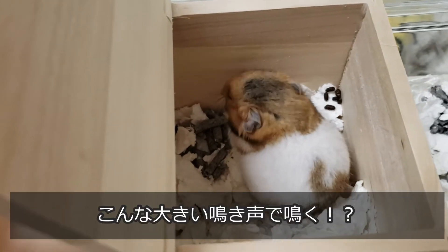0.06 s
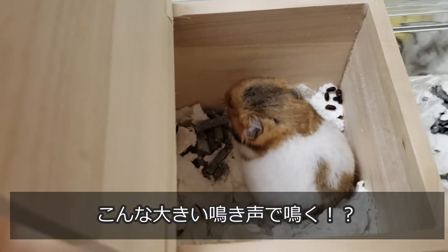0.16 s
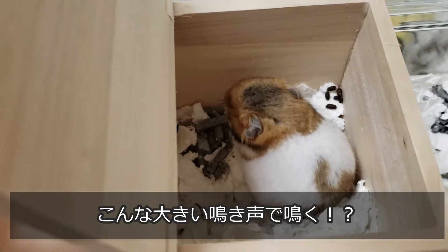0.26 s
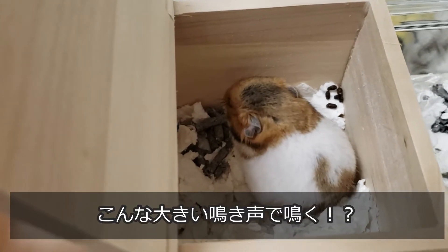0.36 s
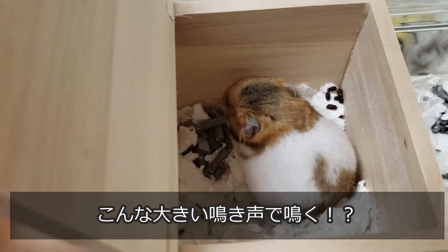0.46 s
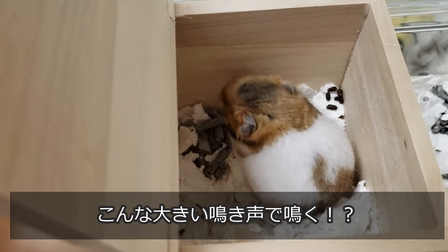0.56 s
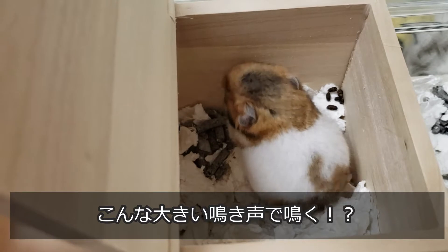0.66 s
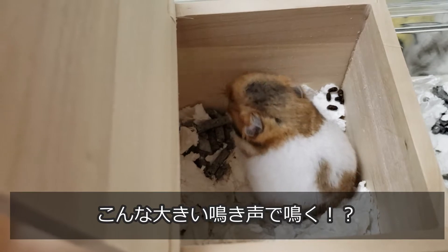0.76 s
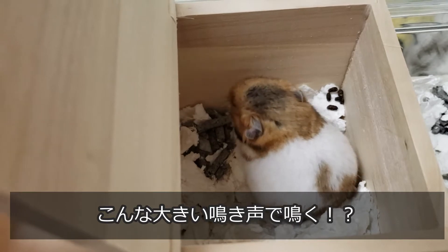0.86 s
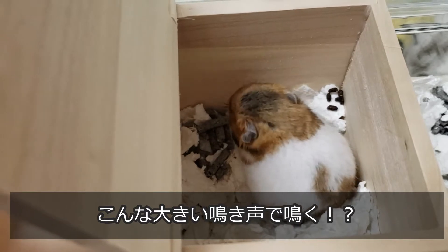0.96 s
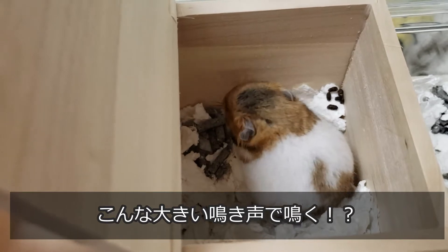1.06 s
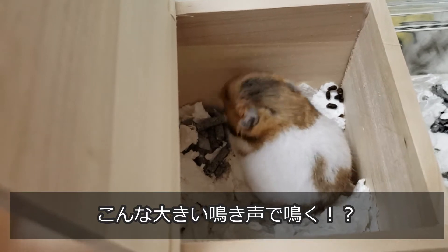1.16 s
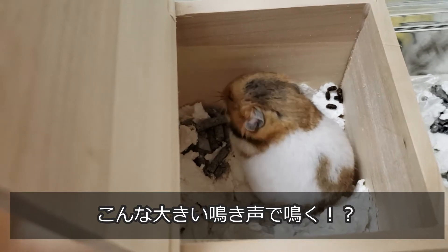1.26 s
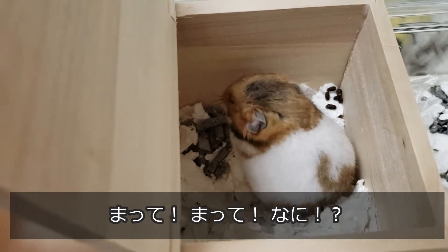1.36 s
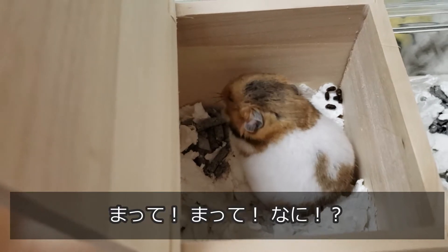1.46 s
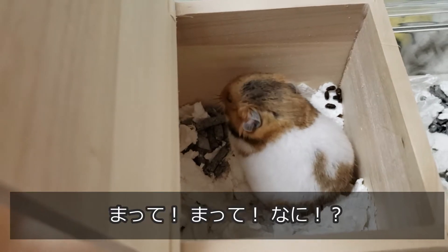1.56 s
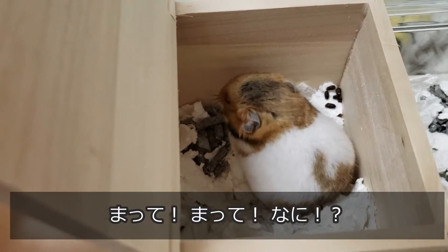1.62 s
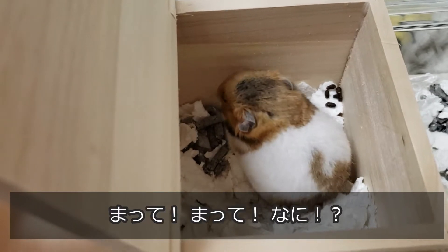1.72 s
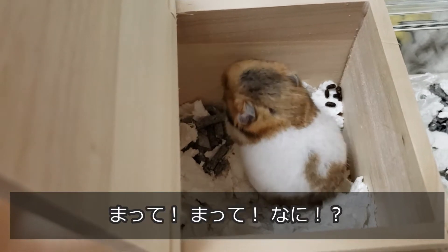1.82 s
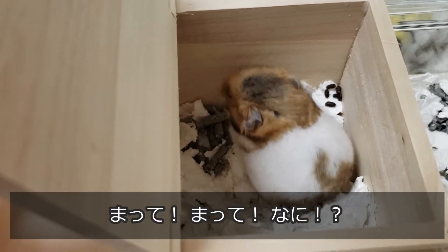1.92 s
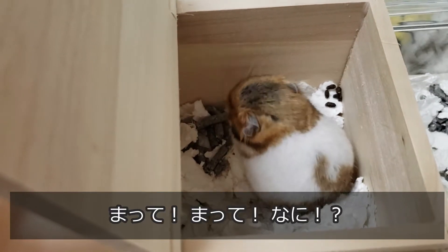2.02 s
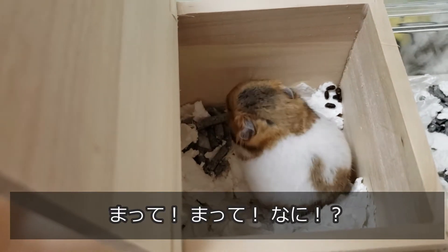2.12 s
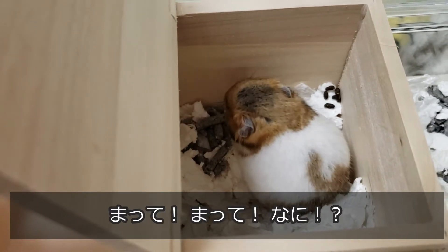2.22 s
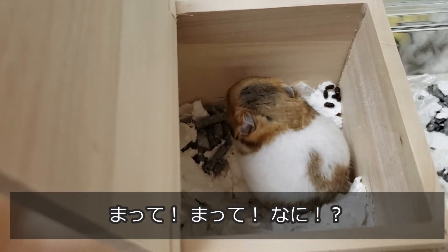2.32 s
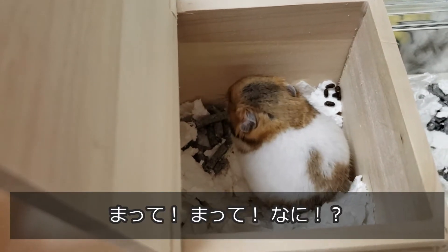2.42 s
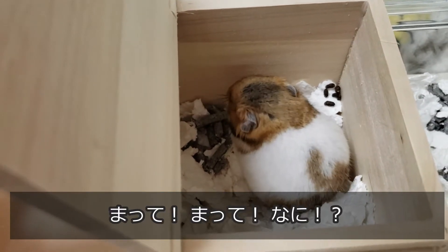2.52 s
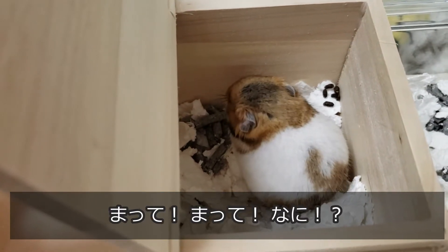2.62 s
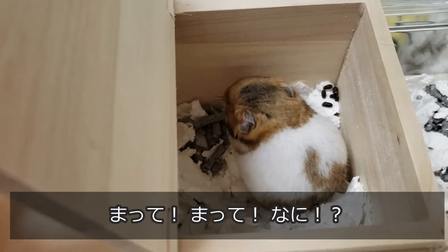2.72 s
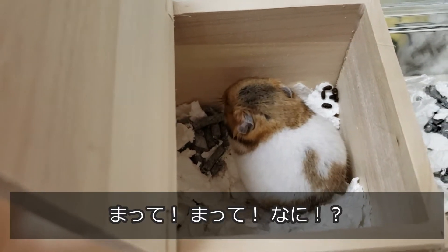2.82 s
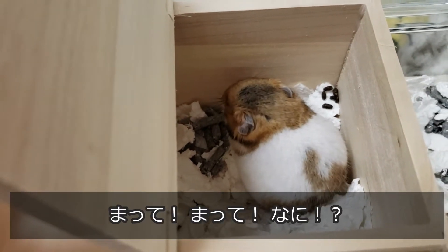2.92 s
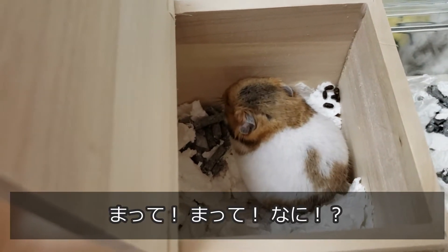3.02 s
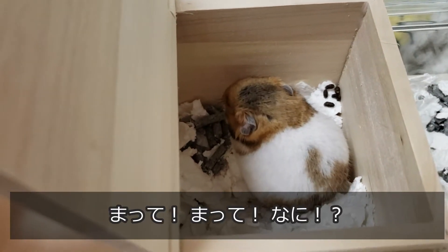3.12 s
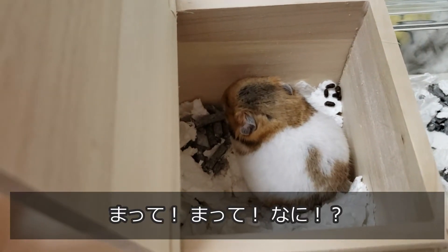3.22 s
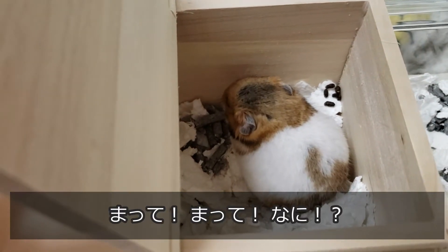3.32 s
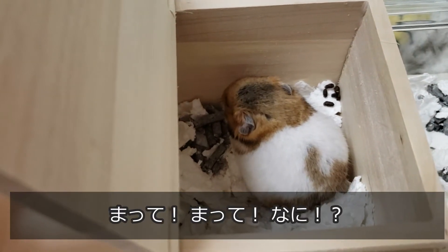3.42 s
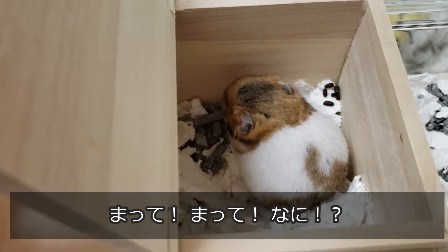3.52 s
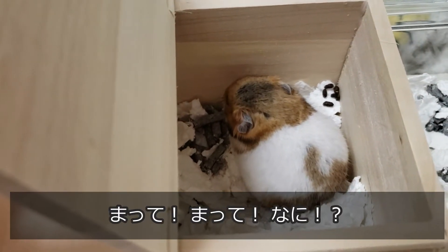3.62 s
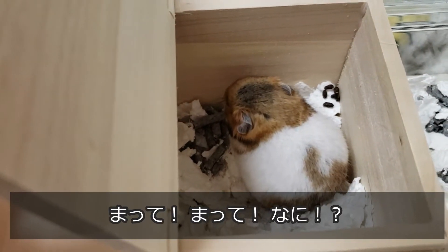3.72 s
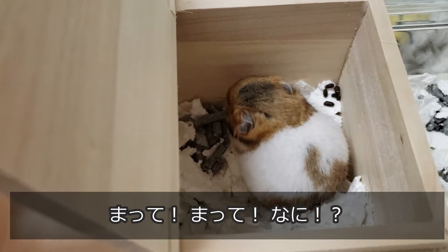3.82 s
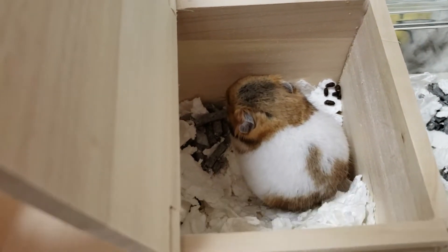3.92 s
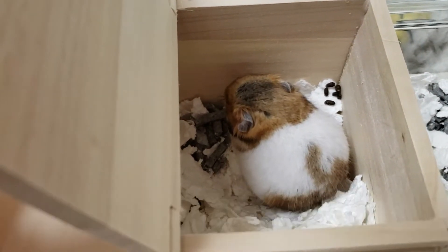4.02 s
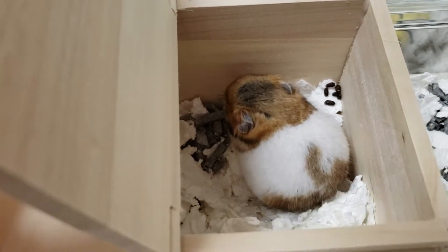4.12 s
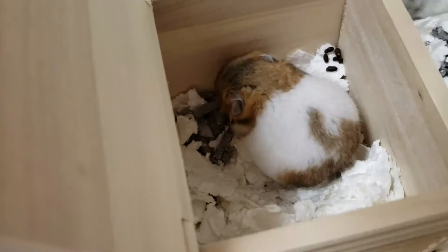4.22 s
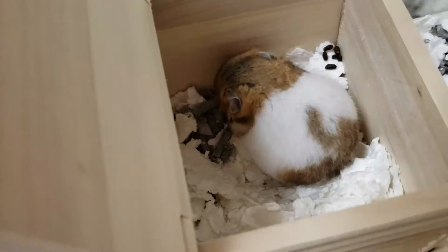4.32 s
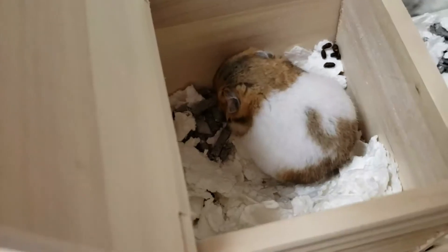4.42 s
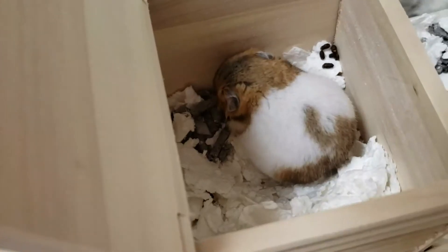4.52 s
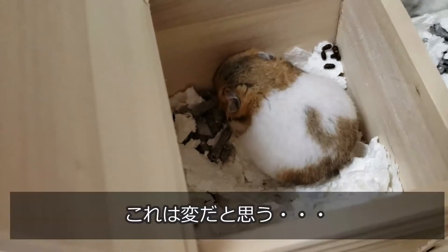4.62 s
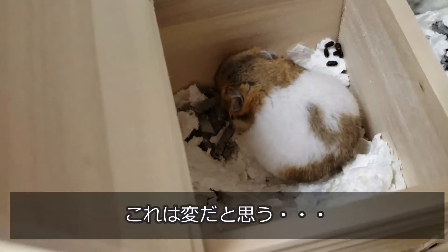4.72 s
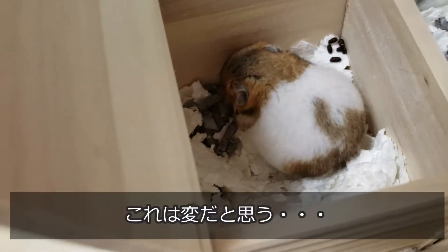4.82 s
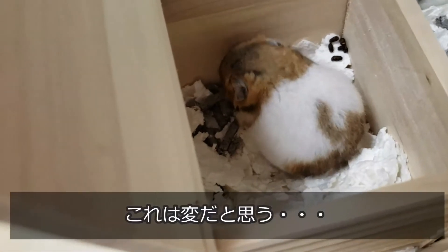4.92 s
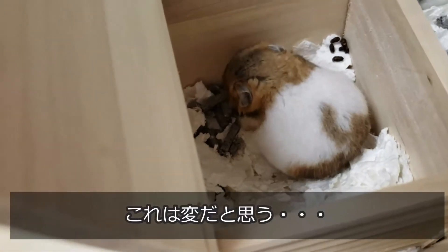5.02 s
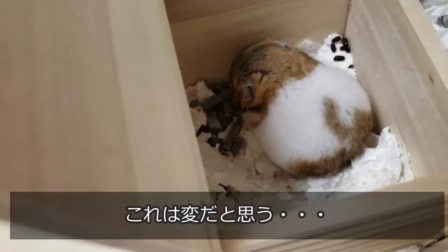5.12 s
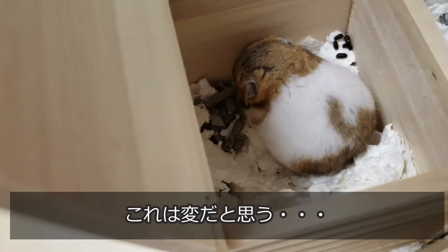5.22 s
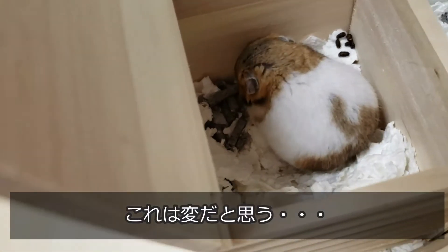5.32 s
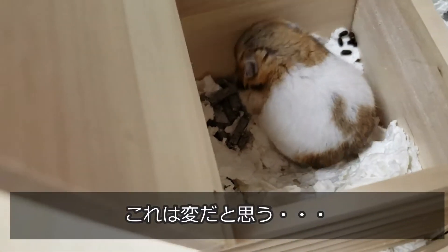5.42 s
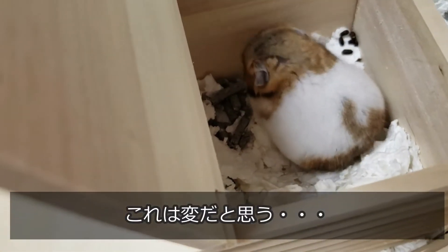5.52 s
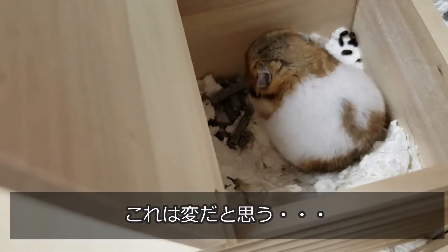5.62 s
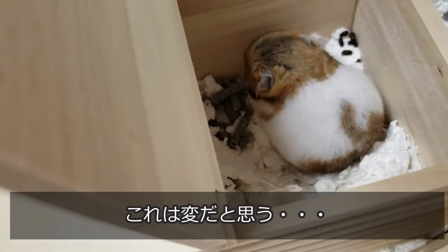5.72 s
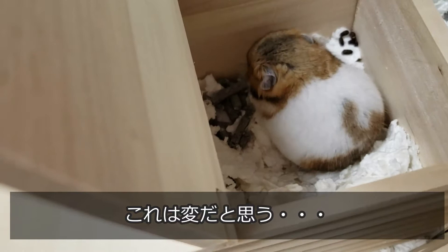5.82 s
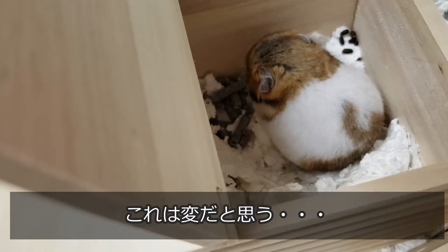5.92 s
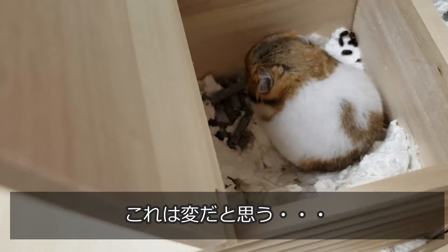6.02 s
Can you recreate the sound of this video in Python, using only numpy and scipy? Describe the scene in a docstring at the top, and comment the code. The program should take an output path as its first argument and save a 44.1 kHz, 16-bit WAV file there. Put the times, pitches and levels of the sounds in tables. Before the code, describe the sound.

In a quiet room with a faint pulsing hum and soft hiss, a close microphone picks up a small rodent inside a wooden box. It gives brief, irregular, raspy hiccups, one with a tiny squeak, followed by sharp little saliva clicks. The microphone shifts with a soft rumble and a very faint high whine enters. A last hiccup ends in a clear, brief squeak.

```python
"""A quiet room, close to a small wooden nest box in which a hamster hiccups.
Each hiccup is a wet rasp through the nose plus a throat puff that rings the box; two carry a short
voiced squeak. In between, films of saliva click in its mouth. Behind it a machine hums and throbs
over soft hiss. Late on, a hand tilts the camera: a low rumble, then the hiccups change colour and
a faint whine joins."""
import sys
import numpy as np
from scipy import signal
from scipy.fft import rfft, irfft
from scipy.io import wavfile
from scipy.ndimage import uniform_filter1d

SR = 44100
rng = np.random.default_rng(int(sys.argv[2]) if len(sys.argv) > 2 else 0)


def transcribe(u):
    """Save the signal u as a 16-bit wav file named by the first command-line argument.

    u: samples, shape (n,) or (channels, n), limited to [-1, 1]; the rate is SR.
    q: integer samples, one column per channel.
    """
    v = np.clip(np.atleast_2d(u).T, -1, 1)
    q = np.round(v * 32767).astype(np.int16)
    wavfile.write(sys.argv[1], SR, q)


N = 267378
TIME = np.arange(N) / SR
TILT_S = 4.25  # the microphones tilt from straight above the box to one side
ATTACK_S = .003  # onset of a burst of air
# how far the right microphone trails the left for sounds from the box: f/Hz, lag/rad
RIGHT_LAG = [(200, .1), (470, 0.6), (690, 1.56), (820, 2.7), (1050, 2.13), (1300, 2.63), (1800, 1.71),
             (2400, 4.6), (2900, 4.6), (3400, 3.76), (4500, 4.43), (6000, 3.6), (7000, 7.1), (9500, 10.8),
             (15000, 3.5)]


def amp(db):
    """Decibels to gain."""
    return 10 ** (np.asarray(db) / 20)


def unit(x):
    """Scales to rms 1."""
    return x / np.sqrt(np.mean(x ** 2) + 1e-20)


def running_rms(x, size):
    """Level follower over both channels, size samples long."""
    return np.sqrt(abs(uniform_filter1d((x ** 2).mean(0), size=size)) + 1e-20)


def at_hz(points, hz):
    """Reads each column of a table along a log-frequency axis."""
    f, *columns = np.transpose(points)
    return np.array([np.interp(np.log(hz + 1), np.log(f + 1), c) for c in columns])


def automation(points, outside=None):
    """Joins (time, value) points into a curve as long as the scene."""
    return np.interp(TIME, *np.transpose(points), left=outside, right=outside)


def add(mix, start_s, sound):
    """Mixes in a stereo sound."""
    part = mix[:, round(start_s * SR):][:, :sound.shape[1]]
    part += sound[:, :part.shape[1]]


def wander(n, hz):
    """Random drift of rms 1, rolling off above hz."""
    return unit(irfft(rfft(rng.standard_normal(n)) / (1 + (np.fft.rfftfreq(n, 1 / SR) / hz) ** 4), n))


def correlate(a, b, likeness):
    """Blends two independent noises into a stereo pair."""
    return np.array([a, likeness * a + np.sqrt(1 - likeness ** 2) * b])


def ring(x, hz, width_hz):
    """A two-pole resonance."""
    r = np.exp(-np.pi * width_hz / SR)
    return signal.lfilter([1, 0, -1], [1, -2 * r * np.cos(2 * np.pi * hz / SR), r * r], x)


def air(level_db=-54.5):
    """A bed of room air and microphone hiss, centred in the lows and wide on top."""
    # colour of the bed: f/Hz, left/dB, right/dB
    colour = [(18, -37, -20), (31.5, -8.5, -13.5), (55.7, -7, -9.5), (98, -5, -4.5), (128, -15.5, -9),
              (272, -25, -12.5), (360, -13.5, -23), (448, -32, -30), (582, -19, -21), (669, -28.5, -26.5),
              (1310, -35, -35), (2160, -33, -30.5), (3400, -37.5, -36), (7240, -40, -45), (8030, -44, -50),
              (13300, -34.5, -33)]
    # stereo image: f/Hz, left-right correlation
    likeness = [(30, 0.78), (250, 0.82), (600, 0.47), (1500, 0.055), (5000, 0.018), (16000, 0.025)]
    hz = np.fft.rfftfreq(N, 1 / SR)
    spectrum = correlate(*rfft(rng.standard_normal((2, N))), at_hz(likeness, hz)[0])
    return amp(level_db) * unit(irfft(spectrum * amp(at_hz(colour, hz)), N))


def whine(level_db=-76.0, width_hz=280, flicker_db=3):
    """A thin, flickering band of treble that enters at the tilt."""
    # centre of the band: t/s, f/Hz
    pitch = [(4.3, 10050), (4.9, 10200), (5.3, 10350), (5.45, 10200), (5.56, 10600), (5.7, 10300),
             (6.06, 10350)]
    carrier = np.sin(2 * np.pi * np.cumsum(automation(pitch)) / SR)
    flicker = amp(flicker_db * wander(N, 7.9))
    spread = np.array([wander(N, width_hz), wander(N, width_hz)])
    fade_in = np.clip((TIME - TILT_S) / 0.054, 0, 1)
    return amp(level_db) * unit(carrier * flicker * spread) * fade_in


def motor_tone(hz, drift_hz):
    """A sine of rms 1 whose pitch wavers."""
    return np.sqrt(2) * np.sin(2 * np.pi * np.cumsum(hz + drift_hz * wander(N, 4.07)) / SR)


def throbbing_hum(hz=72, first_throb_s=.11, throb_db=6, rise_db_per_s=0.57):
    """Two close hums beat; their sum pumps with each beat and slowly grows louder."""
    # gap between the hums, which is the rate of the throb: t/s, f/Hz
    beat_rate = [(0, 3.32), (3.95, 3.32), (4.3, 2.4), (4.65, 3.3), (6.06, 3.3)]
    beats = np.cumsum(automation(beat_rate)) / SR
    beats -= np.interp(first_throb_s, TIME, beats)
    turns = hz * TIME + rng.random()
    lower = amp(-63.0) * np.sin(2 * np.pi * turns)
    upper = amp(-62.5) * np.sin(2 * np.pi * (turns + beats))
    pump_db = throb_db * np.cos(2 * np.pi * beats)
    return np.sqrt(2) * (lower + upper) * amp(pump_db + rise_db_per_s * TIME)


def machine(line_hz=231.5, overtone_hz=376.8):
    """A distant motor: hum, low tones and a rough drone to the right, one overtone to the left."""
    # steady tones of the motor: f/Hz, level/dB
    tones = [(36, -62.5), (90, -70.5), (108, -66), (180, -68)]
    # colour of the drone's noise: f/Hz, level/dB
    colour = [(110, -63), (150, -17.5), (183, -1.5), (200, -2.5), (232, 1), (250, -12), (275, -27),
              (400, -34)]
    # swells and dips of the drone: t/s, level/dB
    swells = [(0.0, -55), (0.46, -45.5), (0.54, -58.5), (0.79, -49), (0.83, -59), (1.15, -52),
              (1.18, -43.5), (1.27, -54.5), (1.74, -48), (1.77, -59.5), (1.87, -43.5), (2.02, -67),
              (2.14, -41), (2.41, -66), (2.73, -49.5), (2.77, -57.5), (3.51, -50), (3.61, -69),
              (3.68, -49.5), (3.83, -59), (3.98, -43), (4.0, -56.5), (4.27, -49.5), (4.3, -62),
              (4.93, -51.5), (5.01, -67), (5.08, -51), (5.87, -52), (5.99, -44.5), (6.06, -62)]
    hz = np.fft.rfftfreq(N, 1 / SR)
    hum = throbbing_hum() + sum(amp(db) * motor_tone(f, drift_hz=0.22) for f, db in tones)
    shape = amp(at_hz(colour, hz)[0]) / (1 + (hz / 500) ** 4)
    rough = unit(irfft(rfft(rng.standard_normal(N)) * shape, N))
    line = motor_tone(line_hz, drift_hz=4.0)
    drone = amp(automation(swells)) * (amp(-2.5) * rough + amp(-6.0) * line)
    overtone = amp(-76.0) * motor_tone(overtone_hz, drift_hz=2.75)
    return (hum + drone) * amp([[-1.8], [1.5]]) + overtone * amp([[2.1], [-2.1]])


def handling():
    """A soft rumble through the camera body as the hand turns it."""
    # the hand shifts its grip: t/s, level/dB
    grip = [(3.6, -84), (4.03, -54.5), (4.15, -62), (4.27, -45), (4.45, -110)]
    noise = correlate(*rng.standard_normal((2, N)), likeness=0.63)
    rumble = ring(ring(noise, hz=60, width_hz=81), hz=90, width_hz=230)
    return unit(rumble) * amp(automation(grip, outside=-np.inf))


def room(x, wet_db=-12.5, echoes_per_s=4000, size=22000):
    """Scattered reflections from the walls, each band dying at its own speed."""
    # reverb time: f/Hz, t60/s
    decay = [(200, 0.19), (600, 0.19), (2000, 0.2), (6000, 0.18), (10000, 0.25), (16000, 0.12)]
    # colour of the tail: f/Hz, level/dB
    colour = [(300, 8.0), (700, -6), (2500, -6.0), (6000, -6.0), (9000, -2.5), (15000, -4.0)]
    echoes = rng.standard_normal((2, size)) * (rng.random((2, size)) < echoes_per_s / SR)
    echoes *= np.clip((TIME[:size] - .004) / 0.0011, 0, 1)  # pre-delay
    hz, t, bands = signal.stft(echoes, SR, nperseg=256)
    tail_db = at_hz(colour, hz).T - 60 * t / at_hz(decay, hz).T
    tail = signal.istft(bands * amp(tail_db), SR, nperseg=256)[1]
    return amp(wet_db) * signal.fftconvolve(x, tail / np.linalg.norm(tail[0]), axes=1)[:, :N]


def in_box(x, colour, bright_db=0.0, shelf_hz=850, size=4096):
    """Carries a source to both microphones: a broad colour with the box's resonances on top."""
    # standing waves of the box: f/Hz, width/Hz, lift/dB
    modes = [(466, 35, 8), (572, 45, 8), (1280, 70, 6), (1912, 60, 5), (2500, 70, 7), (3985, 80, 4),
             (4300, 70, 6), (4970, 70, 6), (5770, 70, 8), (6070, 100, 6)]
    hz = abs(np.fft.fftfreq(size, 1 / SR))
    db = at_hz(colour, hz) + sum(lift / (1 + (2 * (hz - f) / width) ** 2) for f, width, lift in modes)
    db += bright_db * hz ** 6 / (hz ** 6 + shelf_hz ** 6)
    response = np.exp(signal.hilbert(np.log(amp(db))).conj())[:, :size // 2 + 1]  # minimum phase
    response[1] *= np.exp(-1j * at_hz(RIGHT_LAG, hz[:size // 2 + 1])[0])
    taps = np.roll(irfft(response), size // 256, axis=1)[:, :size // 2]
    return signal.fftconvolve(x[None], taps / np.sqrt(np.sum(taps ** 2) / 2), axes=1)


def click(start_s, db, hz, knock_re_db, snap_re_db, spray_s=0.002, crackle_s=0.014, snap_s=0.011):
    """A film of saliva bursts into spray and crackle; the mouth rings high and the box answers."""
    # colours of the hollow knock, the box's thud and the top snap: f/Hz, left/dB, right/dB
    knock_colour = [(300, -28, -38), (930, -50, -17), (1850, -32.5, -10), (2235, -8.5, 5), (2920, -13, -6),
                    (2870, -11.5, 5), (3250, -17, -9.5), (3360, -11, -3.5), (4050, -13, -11),
                    (4500, -11.5, -1.5), (5340, -24, -15.5), (8000, -46, -37)]
    thud_colour = [(150, -24, -7), (433, -1, -4), (700, -9, -1.5), (1000, 1, -5), (1410, -8.5, -6),
                   (2330, -9, 4), (4130, -24.5, -38)]
    snap_colour = [(2020, -54, -54), (7000, -4, -63), (9740, 5.5, -8), (10000, 2, -14), (13000, -2, -8),
                   (15500, 4, -4)]
    mouth_colour = [(2990, 0.016, 1.5), (9000, 0, -5.0)]
    t = TIME[:1500]
    spray, grains = rng.standard_normal((2, len(t)))
    burst = spray * np.exp(-t / spray_s) + 0.12 * unit(grains ** 3) * np.exp(-t / crackle_s)
    burst[0] = 5.5  # the pop itself
    mouth_ring = ring(ring(burst, hz, width_hz=850), hz, width_hz=1440)
    knock_db = db + knock_re_db
    thud_db = -47.5 + 0.5 * (knock_db + 45.5)  # grows half as fast as the knock
    layers = [(mouth_ring, mouth_colour, db - 6.5),
              (burst, knock_colour, knock_db - 2.5),
              (burst, thud_colour, thud_db - 2.5),
              (burst * np.exp(-t / snap_s), snap_colour, knock_db + snap_re_db + 8.5)]
    sound = 0
    for drive, colour, peak_db in layers:
        layer = in_box(drive, colour)
        sound += amp(peak_db) * layer / running_rms(layer, size=88).max()
    return start_s, sound


def saliva_pops(start_s, length_s, nose_db, swell_db, gap_s=.0105, scatter_db=2.0, early_s=.0004):
    """Saliva pops behind closed lips as a hiccup opens, then at uneven gaps while it lasts."""
    late, strength = rng.standard_normal((2, int(length_s / gap_s) + 1))
    offsets_s = gap_s * (np.arange(len(late)) + .12 * late)
    offsets_s[0] = 0
    progress = offsets_s / length_s
    follow_db = swell_db * (progress + 0.21 * (progress - .5))  # a little steeper than the rasp
    levels = nose_db + 2.5 + follow_db + scatter_db * strength
    return [click(start_s - early_s + offset, db, hz=5720, knock_re_db=-17, snap_re_db=-22)
            for offset, db in zip(offsets_s, levels)]


def squeak(start_s, length_s, first_hz, last_hz, db, fall_db, rough_db=2.5, harmonics=4):
    """The vocal folds give a brief falling tone under one arch of effort, rough in its overtones."""
    t = np.arange(0, length_s, 1 / SR)
    hz = first_hz + (last_hz - first_hz) * t / length_s
    jitter = np.interp(db, [-45, -22], [.04, .008])  # a weak voice is less steady
    phase = 2 * np.pi * np.cumsum(hz * (1 + jitter * wander(len(t), 400))) / SR
    voice = 0
    for k in range(harmonics):
        lag = np.array([[0], [1]]) * at_hz(RIGHT_LAG, (k + 1) * hz.mean())[0]
        harmonic_db = db - k * fall_db + rough_db * np.sqrt(k) * wander(len(t), 300)
        voice += amp(harmonic_db) * np.sin((k + 1) * phase - lag)
    effort = abs(np.sin(np.pi * t / length_s)) ** 2.3
    return start_s, np.sqrt(2) * voice * effort


def airflow(n, colour, bright_db=0.0, size=260):
    """Turbulent noise as it sounds in the box, levelled to rms 1."""
    noise = in_box(rng.standard_normal(n + 2 * size), colour, bright_db)
    return (noise / running_rms(noise, size))[:, size:size + n]


def gust(t, length_s, db, swell_db, release_s, leak_db=-18, floor_db=-45):
    """Envelope of a burst of air: faint leak, quick attack, a hold that swells or sags, release."""
    leak_s = 0.83 * length_s
    times = [-ATTACK_S - leak_s, -ATTACK_S, 0, length_s, length_s + release_s]
    levels = [floor_db, leak_db, 0, swell_db, swell_db + floor_db]
    return amp(db + np.interp(t, times, levels, left=-np.inf, right=-np.inf))


def hiccup(start_s, length_s, nose_db, nose_swell_db, delay_s, throat_db, throat_swell_db,
           flutter_hz=330, flutter_db=3.5, uneven_db=2.0, rasp_release_s=.034):
    """Air forced through a wet nose flutters unevenly; a puff from the throat rings the box."""
    # nasal rasp from above the box, then from the side: f/Hz, left/dB, right/dB
    rasp_colours = [
        [(1480, -28, -27.5), (2800, -27.5, -20), (3740, -8.5, -9), (4530, -10, -7), (5960, -17, -3),
         (6700, -8, -18), (7350, -12, -6.5), (7100, -10, -11), (8450, -31, -41), (9500, -10.5, -55),
         (8940, -7.5, -37), (10330, -19, -16), (12900, -31, -45), (15500, -27, -28)],
        [(1520, -20.5, -5), (2780, -18.5, -1), (4230, -33, -20), (5800, -23, -10), (6700, 11.5, -3),
         (7230, -4.5, -28), (7660, 1.5, -32), (7950, -28, -40), (9800, -9.5, -33), (12500, -15, -40),
         (15500, -7.5, -34)],
    ]
    # throat puff from the same two angles: f/Hz, left/dB, right/dB
    puff_colours = [
        [(156, -40.5, -28), (346, -17.5, -16), (506, -1.5, -15.5), (566, -8, 0.5), (810, 1, -2.5),
         (990, -10, -8), (1280, -6.5, -1.5), (1680, -16, -12.5), (2400, -32, -13), (3000, -28, -17.5),
         (5000, -8, -27), (8000, -40, -74.5)],
        [(152, -32, -5.5), (373, 8, -17), (490, -7, -4.5), (730, 3.5, 7), (1030, -11, -5), (1470, -1, -4.5),
         (1810, -19, -18), (2480, -11, -3.5), (3830, -12, 0.5), (5100, -22, -13), (8200, -57, -57)],
    ]
    angle = int(start_s > TILT_S)
    t = np.arange(-length_s - ATTACK_S, length_s + rasp_release_s, 1 / SR)
    n = len(t)
    turns = np.cumsum(flutter_hz * (1 + 0.3 * wander(n, 200))) / SR
    flutter = unit(amp(flutter_db * np.cos(2 * np.pi * turns) + uneven_db * wander(n, 200)))
    rasp = airflow(n, rasp_colours[angle]) * flutter
    rasp *= gust(t, length_s, nose_db - 2.5, nose_swell_db, rasp_release_s)
    puff = airflow(n, puff_colours[angle], bright_db=0.9 * (throat_db + 25.5))  # harder is brighter
    puff *= gust(t - delay_s, max(length_s - delay_s, 0), throat_db, throat_swell_db, release_s=.022)
    return start_s + t[0], rasp + puff


def scene(click_send_db=-2.0, squeak_send_db=-5.0):
    """The hamster in its box over the background; clicks and squeaks stir the room less."""
    # wet mouth clicks: t/s, level/dB, ring f/Hz, relative knock level/dB
    click_cues = [(0.1995, -52, 5900, -20), (0.5594, -52.5, 5800, -23), (1.2153, -66.5, 5800, 7),
                  (2.4892, -44.5, 5900, -13), (2.6182, -54, 6300, 4.5), (2.9225, -58, 6200, 3),
                  (3.0594, -39.5, 5840, -3.5), (3.076, -36, 6070, -9.5), (3.46, -38.5, 6070, -3.5),
                  (3.717, -45.5, 6200, -0.5), (3.7228, -39, 5870, -9), (3.995, -33.5, 6000, -15.5),
                  (4.1633, -25.5, 6200, -3.5), (4.1795, -25.5, 5700, 1), (4.187, -39.5, 6150, 2),
                  (4.2747, -58, 6800, 8.5), (4.531, -43, 6600, -8), (4.5746, -48.5, 6800, -15),
                  (5.058, -51.5, 6900, -15), (5.2701, -33, 6800, -5.5), (5.4397, -35.5, 6230, -5)]
    # voiced squeaks: t/s, length/s, first f/Hz, last f/Hz, level/dB, fall per harmonic/dB
    squeak_cues = [(1.808, .074, 1690, 1364, -52, 3), (5.463, 0.0323, 777, 552, -22.5, 23)]
    # hiccups: t/s, length/s, rasp level/dB, rasp swell/dB, puff delay/s, puff level/dB, puff swell/dB
    hiccup_cues = [(0.1057, 0.0087, -36.5, 0, 0.0024, -35, 2.5), (.4675, 0.0043, -53.5, -6, 0, -44.5, -3),
                   (0.482, .013, -57, 3.5, 0.0087, -56.5, 5), (0.672, 0.032, -34, 13, 0.013, -27, 1.5),
                   (.7535, 0.0032, -33, -7.5, 0.001, -41, -4),
                   (1.657, 0.0058, -52.5, -4, 0.00045, -44.5, 1),
                   (1.687, .014, -57.5, -7, 0.0072, -56, 4.5),
                   (1.867, 0.049, -26, -10.5, 0.012, -36.5, -3.5),
                   (1.95, 0.034, -52.5, -5, 0.0032, -49.5, -7), (5.441, .046, -39, 4.5, 0, -33, -13)]
    background = machine() + air() + whine() + handling()
    hiccups, squeaks, clicks = np.zeros((3, 2, N))
    for cue in click_cues:
        add(clicks, *click(*cue, snap_re_db=-11))
    for cue in squeak_cues:
        add(squeaks, *squeak(*cue))
    for cue in hiccup_cues:
        add(hiccups, *hiccup(*cue))
        for pop in saliva_pops(*cue[:4]):
            add(clicks, *pop)
    reverb = room(hiccups + amp(squeak_send_db) * squeaks + amp(click_send_db) * clicks)
    return background + reverb + clicks + squeaks + hiccups


def record(dry):
    """A steep low-pass trims the very top."""
    lowpass = signal.firwin(511, cutoff=16050, window=("kaiser", 9), fs=SR)
    return signal.oaconvolve(dry, lowpass[None], "same")


dry = scene()
out = record(dry)
transcribe(out)
```